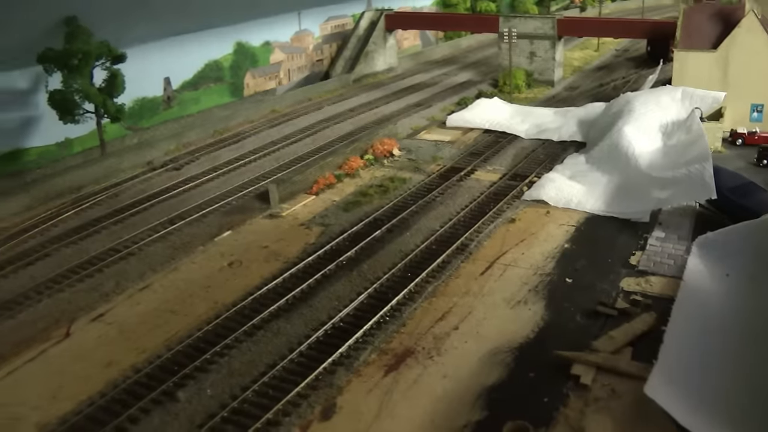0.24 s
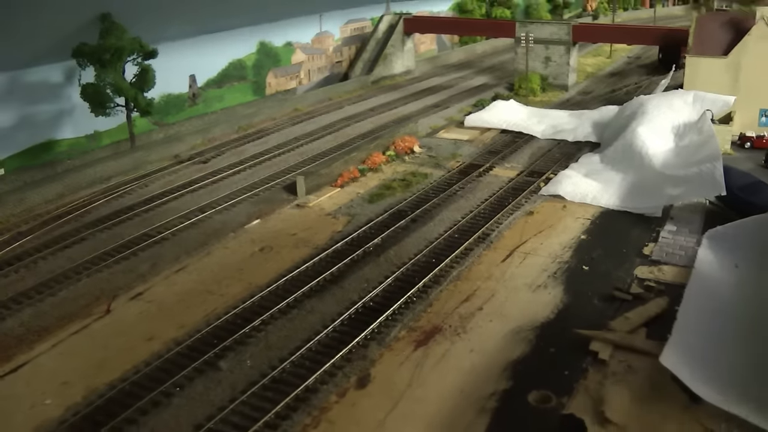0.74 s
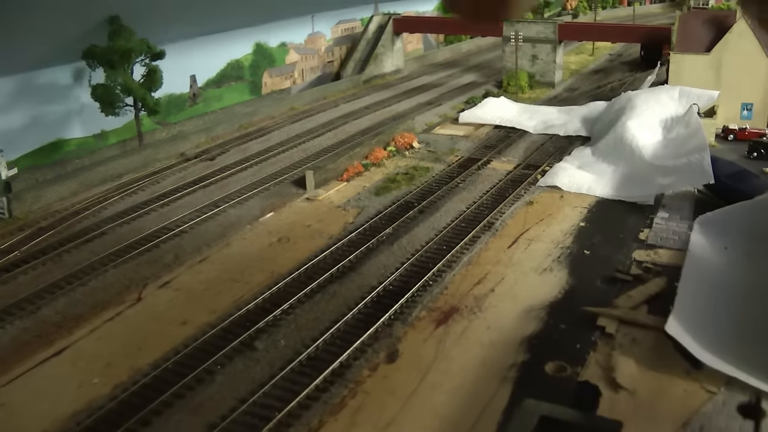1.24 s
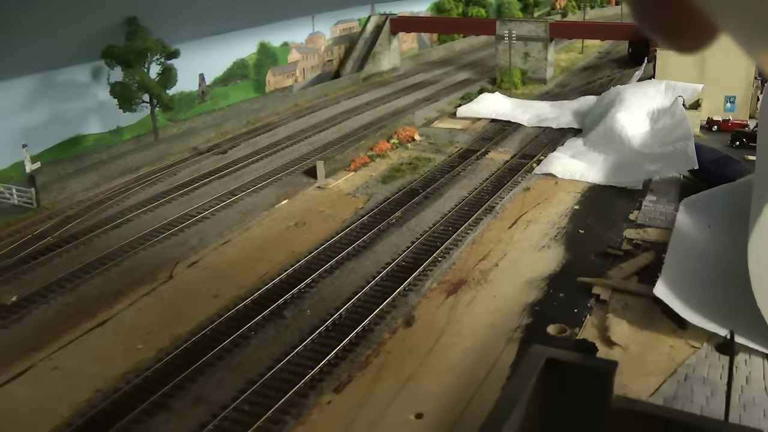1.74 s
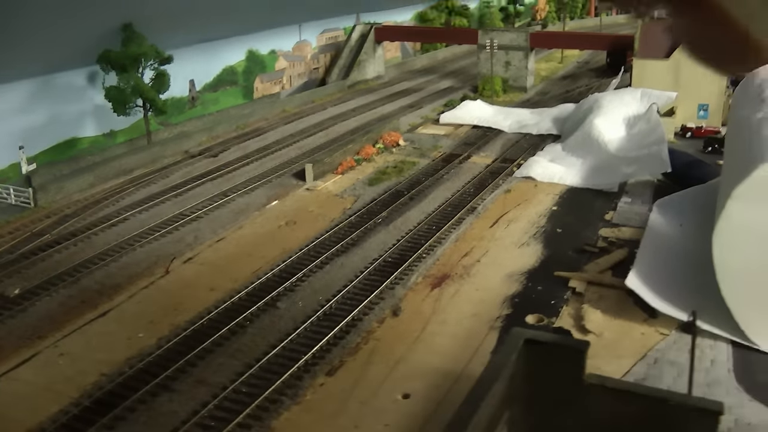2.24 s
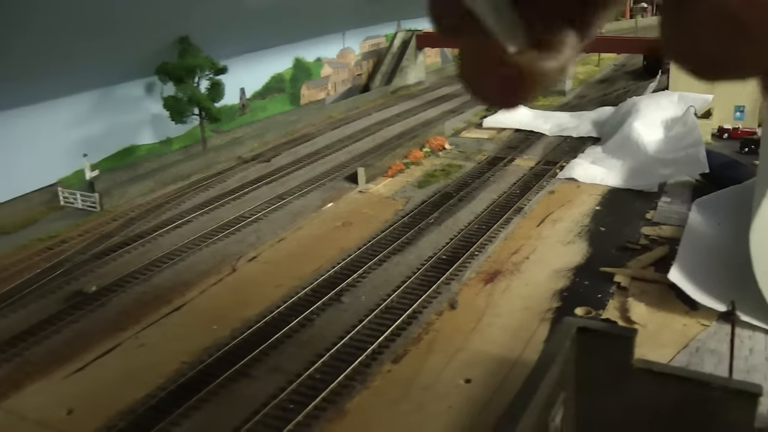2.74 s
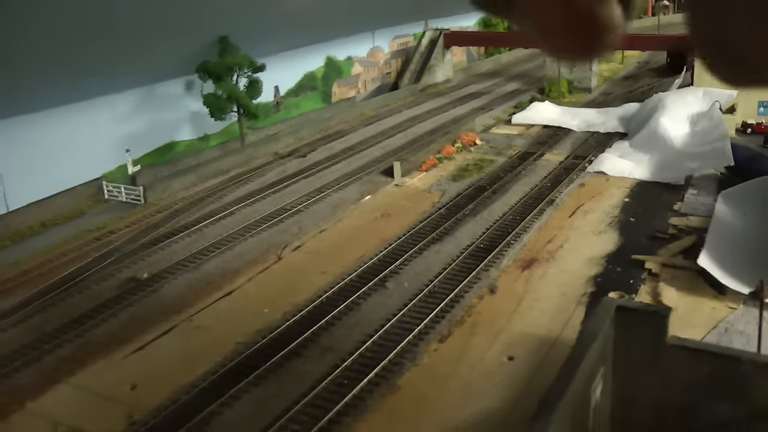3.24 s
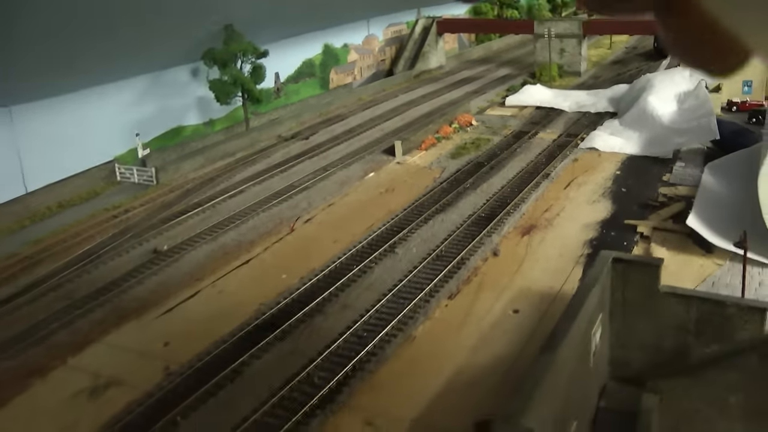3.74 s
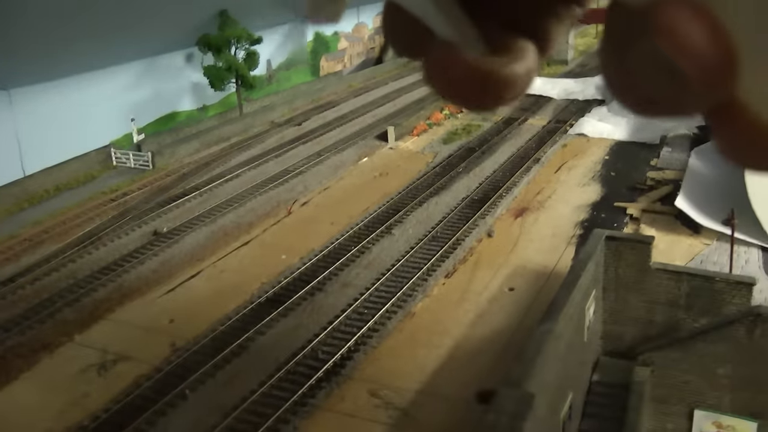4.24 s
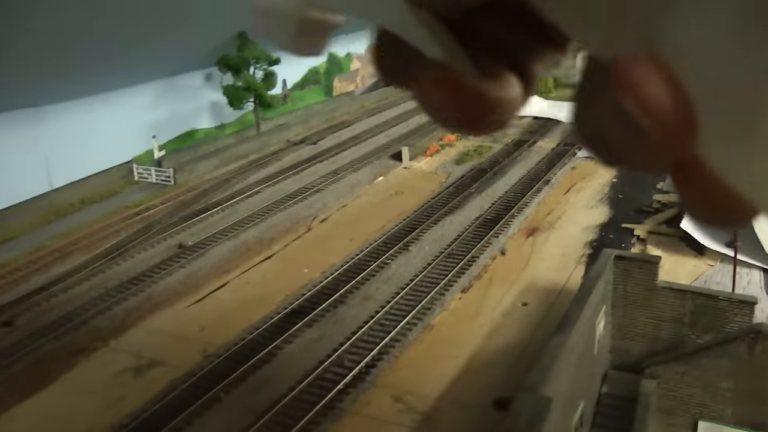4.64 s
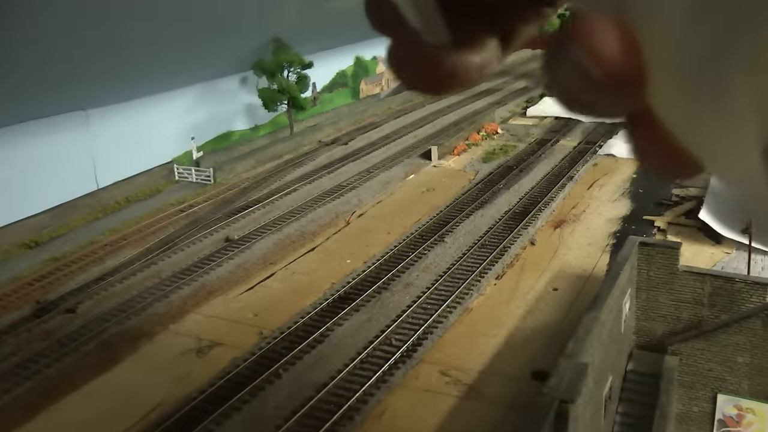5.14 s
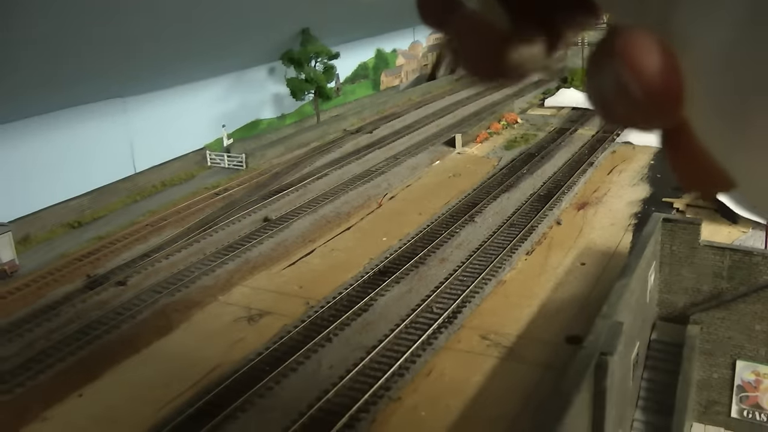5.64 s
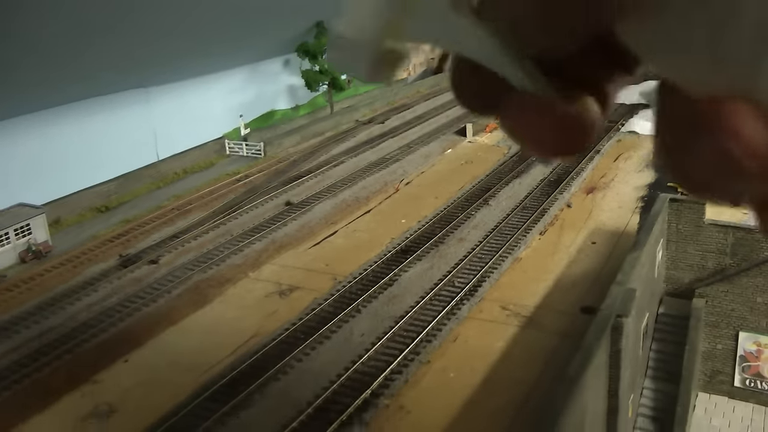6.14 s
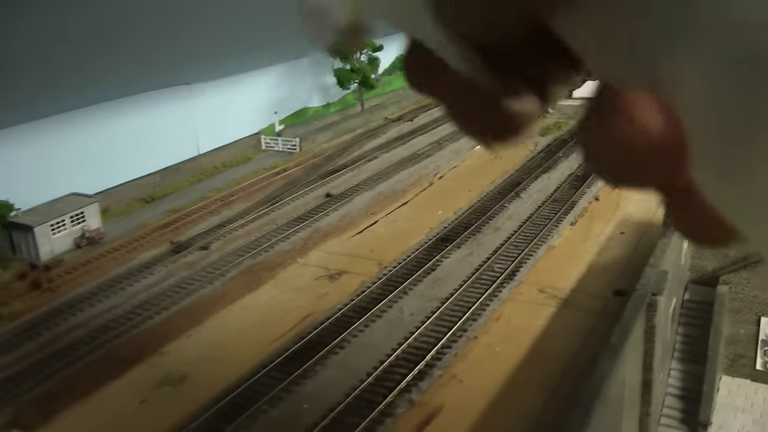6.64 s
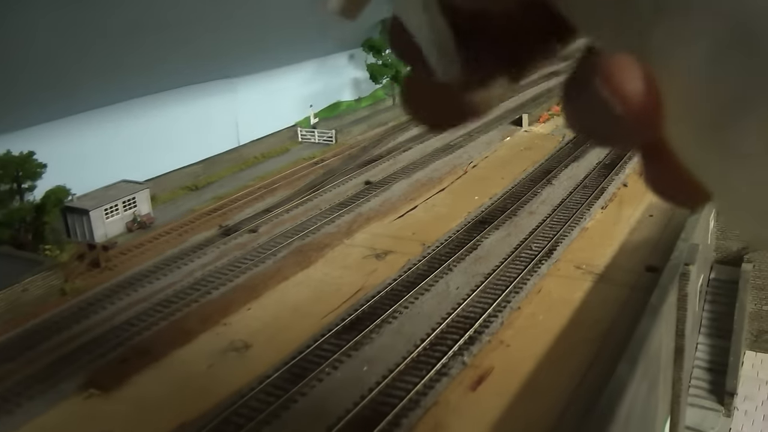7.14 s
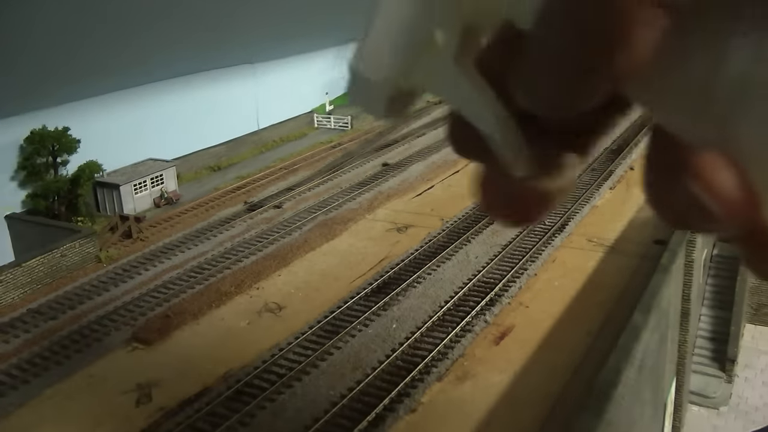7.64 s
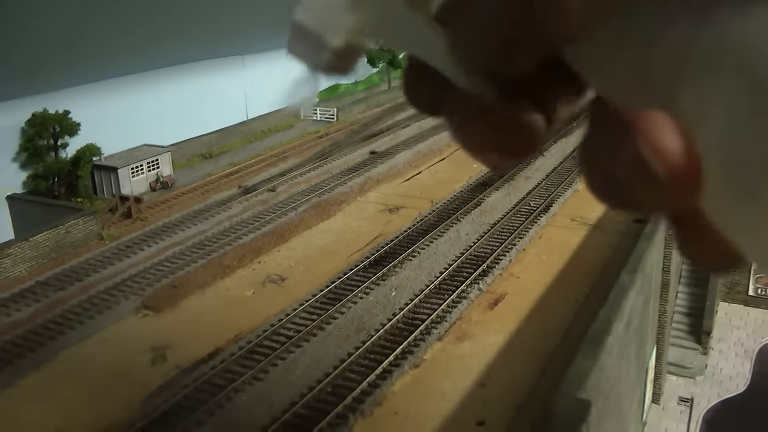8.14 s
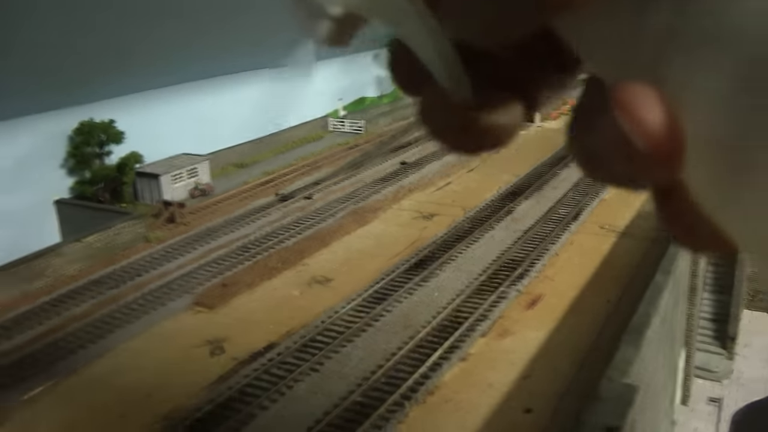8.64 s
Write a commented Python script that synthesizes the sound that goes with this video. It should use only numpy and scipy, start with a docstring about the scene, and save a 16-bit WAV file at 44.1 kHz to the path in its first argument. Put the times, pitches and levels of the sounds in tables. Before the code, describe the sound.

Close, rapid squirts from a hand sprayer, with plastic clicking, rattling returns and tiny squeaks between wet puffs in a small quiet room.

```python
"""A plastic trigger spray bottle is pumped about three times a second, close by, in a small room.
Each pull clacks the trigger, blows that ring plastic resonances, and hisses a puff of shaped, crackling noise.
On release the valve, spring and pump rattle as short runs of slips through the same resonances.
Fingers slide and the pivot squeaks as short gliding tones, and loose parts tick faintly.
The room murmurs as low filtered noise, with a faint two-tone whine and a wavering hum."""
import sys
import numpy as np
from scipy import signal
from scipy.fft import rfft, irfft, next_fast_len
from scipy.io import wavfile
from scipy.ndimage import map_coordinates

SR = 44100
rng = np.random.default_rng(int(sys.argv[2]) if len(sys.argv) > 2 else 0)


def materialize(psi):
    """Save the field psi as 16-bit PCM at rate SR to the path in sys.argv[1].

    A 1-D psi becomes a single channel; in a 2-D psi each row is a channel.
    """
    bounded = np.clip(np.atleast_2d(psi).T, -1, 1)
    quanta = np.round(bounded * 32767).astype(np.int16)
    wavfile.write(sys.argv[1], SR, quanta)


N = 392490

# Resonances of the small loose parts. Each row: centre in Hz, width in Hz, relative strength in dB.
SMALL_PARTS = [(4470, 730, -2.5), (5320, 270, 3.5), (5940, 530, 3.5), (6700, 680, 3.5), (7310, 840, -1),
               (9430, 1100, -4.5), (12460, 1240, -12.5), (14800, 7400, -11.5)]
# Resonances of the trigger lever. Each row: centre in Hz, width in Hz, relative strength in dB.
LEVER = [(2556, 490, -3.5), (2974, 155, 3), (3380, 170, 1), (3720, 240, -1)]
# Trigger pulls. Each row: clack time in seconds, rattle length in seconds, clack in relative dB,
# lever in relative dB, mist delay in seconds, mist hold in seconds, mist in relative dB.
PULLS = [(-.11, .005, -17, -17, .03, .06, -19.5), (.2101, 0.0062, -15, -14, .023, 0.044, -21.5),
         (.4603, 0.007, -19.5, -20, .024, 0.063, -19.5), (0.77, 0.0018, -13.5, -20.5, .0315, 0.056, -20),
         (1.0475, 0.0041, -15.5, -19.5, 0.037, .086, -20), (1.364, 0.0035, -17.5, -17.5, .028, 0.06, -20.5),
         (1.665, 0.0044, -18, -19, 0.037, 0.057, -20), (1.946, 0.0057, -21.5, -24.5, .028, 0.066, -23),
         (2.2698, 0.0021, -18, -17, 0.04, 0.061, -19), (2.5647, 0.0034, -11.5, -18, .031, 0.064, -21.5),
         (2.862, .0081, -21.5, -19.5, .038, .06, -20), (3.1444, .0082, -16, -14, 0.032, 0.062, -20),
         (3.4374, 0.0047, -16, -9, 0.029, 0.061, -34.5), (3.712, 0.0077, -17, -20.5, 0.027, 0.058, -19),
         (3.9782, .0061, -19.5, -22, 0.03, .052, -25.5), (4.2764, 0.0027, -15.5, -14.5, .031, 0.052, -20),
         (4.5755, 0.009, -17.5, -16.5, .029, 0.05, -20), (4.8557, .0028, -17, -14, 0.036, 0.061, -25),
         (5.178, 0.0024, -21, -14, 0.038, 0.072, -24.5), (5.515, .0054, -13.5, -15, .03, 0.064, -19.5),
         (5.8083, .0052, -13, -16, 0.03, 0.067, -20.5), (6.0884, .0088, -14.5, -10.5, 0.023, 0.053, -25.5),
         (6.379, 0.0041, -16, -16, 0.029, 0.067, -19.5), (6.6672, .0045, -20, -19, 0.02, 0.066, -24),
         (6.9484, 0.0064, -17.5, -7, 0.026, 0.061, -27), (7.2259, 0.003, -16, -16, 0.028, 0.071, -18),
         (7.5032, .0046, -15, -10.5, 0.026, .058, -24), (7.7992, 0.0047, -19, -16, 0.029, .079, -18),
         (8.1079, 0.0077, -16, -15, .037, .07, -19.5), (8.4001, 0.0018, -11, -26, .0245, 0.057, -21.5),
         (8.6848, 0.009, -16.5, -15, 0.024, 0.067, -20.5)]


def amp(db):
    """Turn decibels into a linear gain."""
    return 10 ** (np.asarray(db) / 20)


def unit(x):
    """Scale to rms 1."""
    return x / np.sqrt(np.mean(np.abs(x) ** 2) + 1e-20)


def along(points, hz):
    """Read a curve of (Hz, value) points on a log frequency axis."""
    f, value = np.transpose(points)
    return np.interp(np.log(hz + 1), np.log(f + 1), value)


def wobble(rate):
    """A smooth random curve with rate knots a second."""
    knots = rng.standard_normal(int(N * rate / SR) + 4)
    return map_coordinates(knots, [np.arange(N) * rate / SR])


def filtered(x, response):
    """Multiply the spectrum of x by a complex response of frequency."""
    m = next_fast_len(N + SR // 2)
    hz = np.fft.rfftfreq(m, 1 / SR)
    return irfft(rfft(x, m) * response(hz), m)[..., :N]


def mode_responses(f, modes):
    """One causal band-pass resonance per mode, with alternating signs."""
    return np.array([(-1) ** k * amp(db) * 1j * f * width / (centre ** 2 - f * f + 1j * f * width)
                     for k, (centre, width, db) in enumerate(modes)])


def ringing(x, modes):
    """Ring x through summed resonances that pass white noise at unchanged power."""
    return filtered(x, lambda f: unit(mode_responses(f, modes).sum(axis=0)))


def struck(x, modes):
    """Like ringing, but the drive into each mode drifts, so successive blows sound different."""
    vary_db = 1.76
    power_trim_db = vary_db ** 2 * np.log(10) / 20  # keeps the average power
    drive = x * amp([vary_db * wobble(25) - power_trim_db for _ in modes])

    def response(f):
        each = mode_responses(f, modes)
        return each / np.sqrt(np.mean(np.abs(each.sum(axis=0)) ** 2))
    return filtered(drive, response).sum(axis=0)


def spiky(spread_db, rate):
    """Noise of rms 1 whose strength wanders between rate random knots a second."""
    return unit(rng.standard_normal(N) * amp(spread_db * wobble(rate)))


def crackle(rate, spread_db):
    """Sparse random clicks of unequal size, about rate a second, rms 1."""
    hits = rng.random(N) < rate / SR
    signs = rng.choice([-1, 1], N)
    return unit(hits * signs * amp(spread_db * rng.uniform(-1, 1, N)))


def murmur():
    """The room's own low noise, a faint whine and a hum that comes and goes."""
    # Room noise spectrum. Each row: frequency in Hz, density in relative dB.
    noise_curve = [(12, -49), (20, -17), (104, 12.5), (484, -4), (756, -0.5), (1180, -9.5), (1610, -6.5),
                   (1850, -1.5), (2250, -2), (3620, -3.5), (4280, -6.5), (6320, -10.5), (10500, -16.5),
                   (14600, -14), (15900, -15)]
    # Stereo likeness of the noise. Each row: frequency in Hz, left-right correlation from 0 to 1.
    likeness = [(30, 1), (200, 0.83), (1000, 0.93), (4000, 0.84), (12000, 1)]
    # Stereo phase of the room sound. Each row: frequency in Hz, left ahead of right in radians.
    left_lead = [(30, -0.26), (150, 0.035), (400, 1), (1000, 0.2), (2000, 0)]
    # Path of the hum. Each row: time in seconds, pitch in Hz, level in relative dB.
    hum_path = [(0, 105.5, -66), (.1, 105.2, -57), (.3, 109.8, -49), (.45, 109.4, -75), (2.2, 84, -67),
                (2.35, 86.4, -56), (2.7, 93.4, -51), (2.95, 101.5, -56), (3.1, 100, -75), (5.3, 79.5, -75),
                (5.4, 80.3, -56), (5.62, 76.8, -53), (5.75, 79, -71)]
    # Tones of the whine. Each row: frequency in Hz, level in dB before a slow flutter.
    whine_tones = [(457, -64), (915, -59)]

    def mid_side(hz):
        turn = np.arccos(np.clip(along(likeness, hz), -1, 1)) / 2
        return amp(along(noise_curve, hz)) * [np.cos(turn), np.sin(turn)]

    mid, side = filtered(rng.standard_normal((2, N)), mid_side)
    air = amp(-44.0 + 0.4 * wobble(2.91)) * unit(np.array([mid + side, mid - side]))

    t = np.arange(N) / SR
    s, hz, db = np.transpose(hum_path)
    hum_turns = 2 * np.pi * np.cumsum(np.interp(t, s, hz)) / SR
    hum = amp(np.interp(t, s, db) + 5 + 2.5 * wobble(34)) * np.sin(hum_turns)
    whine = sum(amp(tone_db + 2.8 * wobble(6.2)) * np.sin(2 * np.pi * tone_hz * t + 0.5 * wobble(7.9))
                for tone_hz, tone_db in whine_tones)
    return filtered(air + hum + whine, lambda f: np.exp(0.5j * along(left_lead, f) * [[1], [-1]]))


def walls(x, spread=0.64):
    """The room's answer: a noise tail whose frequencies die at their own speeds, partly shared by both sides."""
    # Decay of the tail. Each row: frequency in Hz, time to fall 60 dB in seconds; above about 10 kHz the tail
    # dies very quickly.
    decay_times = [(200, 0.37), (2000, 0.087), (9000, 0.086), (13000, 0.038)]
    hz, t, z = signal.stft(rng.standard_normal((2, SR // 2)), SR, nperseg=256)
    decay = amp(-60 * t / along(decay_times, hz)[:, None])
    mid, side = signal.istft(z * decay, SR, nperseg=256)[1]
    tail = np.array([mid + spread * side, mid - spread * side])
    tail /= np.linalg.norm(tail[0])
    delayed = np.pad(x, (130, 0))  # about 3 ms before the tail begins
    return signal.fftconvolve(delayed[None], tail, axes=1)[:, :N]


def jolts():
    """A shove through the housing: a short thump that is almost opposite in phase left and right."""
    # Each row: start in seconds, level in relative dB.
    shoves = [(6.9485, -11)]
    out, t = np.zeros(N), np.arange(SR // 20) / SR
    for s, db in shoves:
        thump = np.e * t / 0.0012 * np.exp(-t / 0.0015) * (1 - t / 0.0067)
        out[round(s * SR):][:len(t)] += amp(db) * thump
    opposed = filtered(out, lambda hz: np.exp(1.25j * np.array([[1], [-1]])) + 0 * hz)
    return opposed * amp([[-1], [1]])


def creaks():
    """Loose parts tick faintly in random clumps: sparse clicks ringing the small parts and lever."""
    ticks = ringing(crackle(rate=200, spread_db=7.0), SMALL_PARTS + LEVER)
    return amp(-57.0 + 3.7 * wobble(27)) * ringing(ticks, [(5500, 6800, 0)])


def slides():
    """Skin drags over plastic: a sinking tone made rough by fast random modulation."""
    # Each row: start in seconds, length in seconds, start pitch in Hz, end pitch in Hz, level in relative dB.
    drags = [(1.886, 0.049, 900, 250, -41), (6.414, 0.031, 400, 200, -36), (8.557, .04, 900, 250, -42)]
    out = np.zeros(N)
    for s, length, start_hz, end_hz, db in drags:
        u = np.linspace(0, 1, round(length * SR))
        turns = 2 * np.pi * np.cumsum(start_hz * (end_hz / start_hz) ** u) / SR
        envelope = amp(db + 4.5 - 4.7 * u) * np.minimum(u / 0.11, 1)
        out[round(s * SR):][:len(u)] += envelope * np.sin(turns)
    return out * wobble(350)


def squeaks():
    """Plastic rubbing on plastic sticks and slips at an even rate: a short tone with a weak octave."""
    # Pivot squeaks. Each row: start in seconds, length in seconds, start pitch in Hz, end pitch in Hz,
    # level in relative dB.
    chirps = [(0.707, 0.012, 2510, 2880, -24), (1.031, 0.011, 2600, 2600, -31.5),
              (2.215, .012, 2580, 2540, -41), (2.821, 0.013, 5500, 5480, -34),
              (4.517, 0.014, 2530, 2710, -28), (5.769, .012, 2700, 2680, -35),
              (6.335, 0.011, 2660, 2800, -28), (6.8, 0.05, 1950, 2020, -52),
              (6.921, 0.026, 3240, 3276, -43), (7.19, 0.017, 2700, 2600, -32),
              (7.211, .013, 2800, 3100, -29), (7.475, 0.027, 1090, 1090, -48)]
    out = np.zeros(N)
    for s, length, start_hz, end_hz, db in chirps:
        u = np.linspace(0, 1, round(length * SR))
        turns = 2 * np.pi * np.cumsum(start_hz + (end_hz - start_hz) * u) / SR
        tone = np.sin(turns) + 0.3 * np.sin(2 * turns)
        out[round(s * SR):][:len(u)] += amp(db + 5.0) * np.sin(np.pi * u) ** 0.5 * tone
    return out * amp(3.4 * wobble(320))


def contacts():
    """List every contact as (s, rattle length s, lever, small parts, pump, bottle in relative dB)."""
    # The lever rebounds just after a pull. Each row: time in seconds, rattle length in seconds,
    # lever in relative dB.
    rebounds = [(.776, 0.005, -21), (1.0546, 0.0068, -28), (1.672, .0021, -22), (2.276, 0.0064, -24),
                (3.4448, 0.0085, -15), (4.282, .0029, -18.5), (4.8612, 0.0061, -18.5),
                (5.1834, 0.0049, -26), (6.3863, .0052, -25), (6.957, .004, -12), (6.9628, 0.0045, -16),
                (7.23, .008, -24.5), (7.5101, .0053, -12.5), (7.8061, 0.0043, -20), (8.4042, 0.0036, -18.5)]
    # The valve rattles twice on release. Each row: time in seconds, level in relative dB,
    # gap to the second rattle in seconds, second rattle in relative dB.
    releases = [(.1065, -27, 0.016, -29.5), (.3804, -26, .016, -32), (0.6487, -26.5, .0215, -35),
                (.969, -26, .016, -31), (1.2688, -26, .022, -35), (1.559, -28.5, .023, -30.5),
                (1.8725, -26.5, 0.025, -37), (2.1551, -29.5, .017, -43), (2.4778, -28, 0.011, -27),
                (2.775, -25.5, .019, -35), (3.066, -27, 0.017, -30), (3.3503, -29, 0.019, -31),
                (3.644, -29, .027, -36), (3.9023, -27.5, 0.011, -27), (4.1842, -36.5, 0.0032, -28),
                (4.445, -41, 0.028, -24), (4.767, -25, 0.017, -33), (5.094, -26.5, 0.0092, -34),
                (5.432, -28, 0.022, -38), (5.714, -26, .012, -31), (6.0123, -26, .0157, -32),
                (6.2814, -26, 0.013, -35), (6.59, -28, .022, -38), (6.857, -26.5, .017, -34.5),
                (7.1355, -28.5, .0183, -33), (7.423, -27, 0.01, -31), (7.6844, -28.5, .0156, -33),
                (8.01, -26, .025, -35), (8.3168, -26, .0142, -30), (8.5933, -29.5, 0.023, -36),
                (8.8575, -40.5, 0.034, -25)]
    # The piston thuds home on the way back. Each row: time in seconds, level in relative dB.
    thuds = [(.192, -28), (.6904, -22.5), (1.002, -24), (1.5924, -19), (1.654, -36), (2.189, -25.5),
             (2.469, -37), (2.8124, -30), (3.0991, -12), (4.212, -29), (4.7965, -15), (5.1363, -30),
             (5.467, -24), (5.77, -34), (6.3133, -33), (6.3224, -27.5), (6.413, -19.5), (7.178, -22),
             (7.73, -21)]
    # The returning lever knocks on its pivot. Each row: time in seconds, rattle length in seconds,
    # lever in relative dB, small parts in relative dB.
    knocks = [(0.702, .0043, -26, -34), (0.709, .0046, -25, -33), (1.0104, .0047, -26.5, -29.5),
              (1.034, .0031, -30, -28), (1.6056, .0038, -27, -28.5), (1.6146, .0032, -27, -26.5),
              (2.2076, .0032, -26, -27), (2.4843, .0023, -29, -31), (2.5247, .018, -26.5, -34),
              (2.8204, 0.0099, -25.5, -34), (3.11, 0.0094, -21, -24), (3.6868, .0022, -25, -22),
              (4.223, .0032, -19.5, -26), (4.2294, .0048, -35, -33), (4.5207, 0.0065, -23.5, -28.5),
              (4.809, 0.0048, -19.5, -24.5), (4.818, .0034, -28, -28), (5.144, 0.0018, -26, -23.5),
              (5.4802, .0041, -18.5, -23), (5.5067, .0025, -30, -24), (5.774, 0.0043, -29, -30.5),
              (5.793, .0041, -34, -31), (6.326, .013, -32, -47), (6.34, .0027, -23.5, -32.5),
              (6.372, .0028, -31, -30), (7.19, .0063, -27, -34.5), (7.2007, .0063, -33, -39),
              (7.219, .003, -33, -33), (7.718, 0.011, -35.5, -34), (7.743, .0049, -29, -28.5),
              (7.751, .0067, -37, -38), (7.781, .0031, -33, -29), (8.671, 0.0042, -28, -29)]
    # The spring ticks. Each row: time in seconds, level in relative dB.
    spring_ticks = [(.158, -35), (.37, -40), (.422, -40), (.444, -36), (.6393, -38), (.68, -38),
                    (.733, -26), (.9163, -36), (1.017, -25.5), (1.315, -38), (1.323, -38), (1.331, -41),
                    (1.355, -37), (1.63, -36), (1.915, -40), (2.201, -32), (2.2188, -37), (2.245, -41),
                    (2.834, -38), (2.8515, -38), (3.058, -34), (3.3879, -36), (3.399, -29), (3.434, -30),
                    (3.972, -32), (4.247, -32), (4.2623, -34), (4.549, -38), (4.5645, -28), (4.83, -37),
                    (4.838, -35), (5.1635, -38), (6.0426, -33), (6.6316, -28), (6.912, -38), (6.9453, -27),
                    (7.172, -30), (7.4528, -36), (7.4615, -27), (7.468, -37), (7.499, -22), (8.106, -24),
                    (8.3937, -30), (8.887, -30)]
    # The grip drags along the bottle. One row: time in seconds, length in seconds,
    # then lever, small parts, pump and bottle in relative dB.
    scrape = (8.558, .055, -37, -41, -38, -35.5)

    # Colours in dB: lever, small parts, pump, bottle
    valve_db = (-6, 0, -12.5, -23)
    thud_db = (1, -9.5, -5.5, -9.5)
    tick_db = (-12, 0, -16, -23)

    def alike(s, length, db, colour_db):
        return (s, length, *(db + np.array(colour_db)))

    # the bottle's answer to a clack grows more slowly than the clack
    rows = [(s, length, lever_db, db, db - 2.5, -27.5 + 0.51 * (db + 17.5))
            for s, length, db, lever_db, *_ in PULLS]
    rows += [(s, length, db, db - 6, db - 5.5, -30) for s, length, db in rebounds]
    rows += [alike(s, 0.0092, db, valve_db) for s, db, _, _ in releases]
    rows += [alike(s + gap, 0.0066, db, valve_db) for s, _, gap, db in releases]
    rows += [alike(s, 0.0034, db, thud_db) for s, db in thuds]
    rows += [(s, length, db, parts_db, db - 12, db - 16.5) for s, length, db, parts_db in knocks]
    rows += [alike(s, 0.0028, db, tick_db) for s, db in spring_ticks]
    return [row for row in rows + [scrape] if row[0] > 0]


def trigger():
    """Each contact is a blow and a short run of slips that ring the lever, pump, small parts and bottle."""
    # Pump resonances. Each row: centre in Hz, width in Hz, relative strength in dB.
    pump_modes = [(1401, 82, -3), (1799, 132, 0), (2040, 247, -3.5)]
    # Bottle resonances. Each row: centre in Hz, width in Hz, relative strength in dB.
    bottle_modes = [(236.4, 83, 1.5), (419, 81, -4), (544, 54, -2), (727, 79, 4.5), (889, 220, 0),
                    (1150, 130, -5.5)]
    hard_blow, soft_blow, soft_below_db = 7.94, 5, -25.5  # quiet contacts start more gently
    graze_s = 0.002  # the parts graze before they meet

    lever, pump, parts, bottle = np.zeros((4, N + SR))
    blows, t = np.zeros(N), np.arange(SR // 10) / SR
    for s, length, lever_db, parts_db, pump_db, bottle_db in contacts():
        i = max(round((s - graze_s) * SR), 0)
        # slips weaken, then die once the part seats
        fade_db = -5 * t / length - 60 * np.maximum(t - graze_s - length, 0) / 0.023
        creep_db = -9000 * np.maximum(graze_s - t, 0) - 8 * (t < graze_s)
        force = amp(3 + fade_db + creep_db)
        lever[i:i + len(t)] += force * amp(lever_db)
        pump[i:i + len(t)] += force * amp(pump_db)
        parts[i:i + len(t)] += force * amp(parts_db + 0.5 - 134 * t)
        bottle[i:i + len(t)] += force * amp(bottle_db + 0.5)
        blows[round(s * SR) + 10] = hard_blow if max(lever_db, parts_db) > soft_below_db else soft_blow

    slips = blows + spiky(spread_db=4.5, rate=1000)
    bottle_slips = 1.42 * blows + spiky(spread_db=3.0, rate=610)
    # a second broad resonance steepens the skirts: a thin plastic part
    lever_sound = amp(-7) * ringing(struck(lever[:N] * slips, LEVER), [(3000, 3470, 0)])
    pump_sound = struck(pump[:N] * slips, pump_modes)
    parts_sound = struck(parts[:N] * slips, SMALL_PARTS)
    bottle_sound = struck(bottle[:N] * bottle_slips, bottle_modes)
    # the bright snap itself, mostly above the modes
    snap = amp(-4.0) * ringing(parts[:N] * (slips - 0.2 * blows), [(13700, 7400, 0)])
    return lever_sound + pump_sound + parts_sound + bottle_sound + snap


def mist():
    """Liquid tears into droplets at the nozzle while the piston holds the pressure, then dribbles away."""
    # Spray spectrum. Each row: frequency in Hz, density in relative dB.
    spray_curve = [(88, -51), (150, -15.5), (465, -16), (544, -11), (636, -14.5), (743, -9), (903, -13),
                   (1080, -10.5), (1310, -11), (2440, -0.5), (3210, -4.5), (5760, -2.5), (10600, -12.5),
                   (14700, -18), (15900, -14.5)]
    rise_share, fall_s = 0.26, 0.025  # pressure builds over a share of the delay

    t, low, high = np.arange(N) / SR, np.zeros(N), np.zeros(N)
    for s, *_, delay, hold, db in PULLS:
        rise = rise_share * delay
        steps = [-rise, rise, rise, hold / 2, hold / 2, fall_s, 1.25 * fall_s, 4 * fall_s, 0.2]
        times = s + delay + np.cumsum(steps)
        pressure_db = np.interp(t, times, [-36, -14, -4.5, 0, -4.5, -17.5, -28.0, -61, -111], left=-120)
        bright_db = 4 + 0.18 * (db + 20)  # louder puffs are brighter
        low += amp(db + 3 + 1.015 * pressure_db - bright_db / 2)
        high += amp(db + 1 + pressure_db + bright_db / 2)
    top = high * (high / amp(-3)) ** 0.1  # strong puffs gain the most at the very top
    splash = low * (low / amp(-21)) ** 0.18  # the lowest splash swells later and ends sooner

    droplets = spiky(spread_db=0.5, rate=1200) + 0.45 * crackle(rate=1500, spread_db=5.5)
    jet = filtered(droplets, lambda hz: unit(amp(along(spray_curve, hz))))
    deep = filtered(jet, lambda hz: 1 / (1 + (hz / 1700) ** 4))
    dull = filtered(jet, lambda hz: 1 / (1 + (hz / 4300) ** 4))
    bright = filtered(jet, lambda hz: 1 / (1 + (10000 / (hz + 1)) ** 6))
    # each band flutters on its own
    return (splash * deep * amp(2.0 * wobble(60))
            + low * (dull - deep) * amp(1.47 * wobble(80))
            + high * (jet - dull - bright) * amp(1.87 * wobble(80))
            + top * bright * amp(0.58 * wobble(54)))


def scene():
    """Place the spray near the centre and the handling noises to the right, and add the room."""
    # Level balance of the handling. Each row: frequency in Hz, left minus right in dB.
    lean = [(100, -2), (160, -8.5), (350, -7), (570, -13), (850, -3.5), (1200, -0.5), (1800, -2.5),
            (2700, -2.5), (4000, -0.5), (12000, -1)]
    # Stereo phase of the handling. Each row: frequency in Hz, left ahead of right in radians.
    lead = [(160, -0.33), (250, -0.97), (370, -1.5), (570, 0.94), (850, 0.35), (1200, 0.43), (4000, 0.025)]

    def place(hz):
        left = amp(along(lean, hz) / 2) * np.exp(0.5j * along(lead, hz))
        return left ** np.array([[1], [-1]])  # the right side gets the inverse

    spray = mist()
    hand = trigger() + squeaks() + slides() + creaks()
    spray_sound = spray * amp([[0.2], [-0.2]]) + amp(-14) * walls(spray)
    hand_sound = filtered(hand, place) + amp(-12.5) * walls(hand, spread=0.79)
    return spray_sound + hand_sound + jolts() + murmur()


def record(dry):
    """Peaks are rounded off below 0.9 of full scale, then everything from 16 kHz up is removed."""
    clipped = dry / (1 + np.abs(dry / 0.9) ** 8) ** (1 / 8)
    return filtered(clipped, lambda hz: hz < 16000)


dry = scene()
out = record(dry)
materialize(out)
```